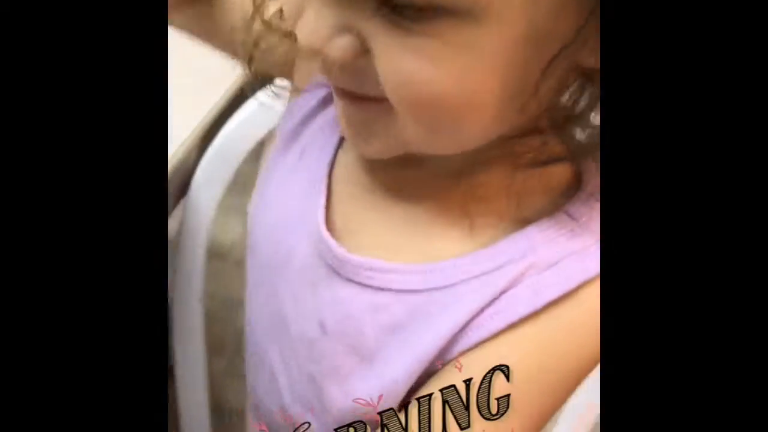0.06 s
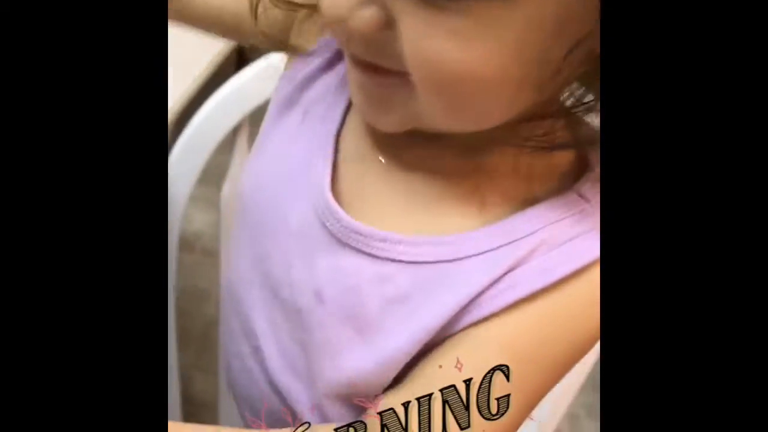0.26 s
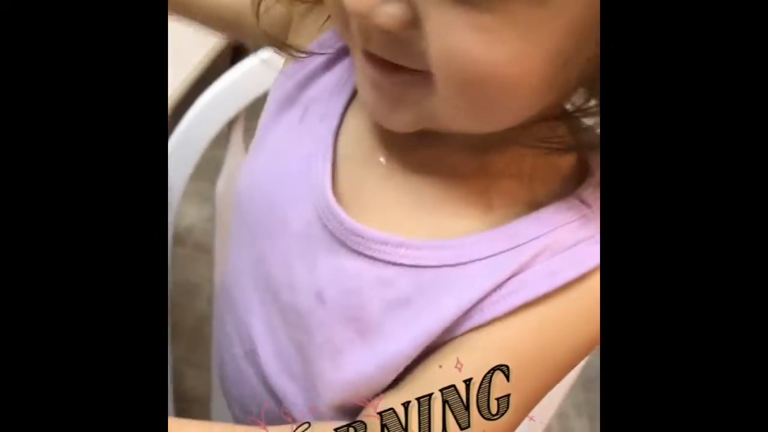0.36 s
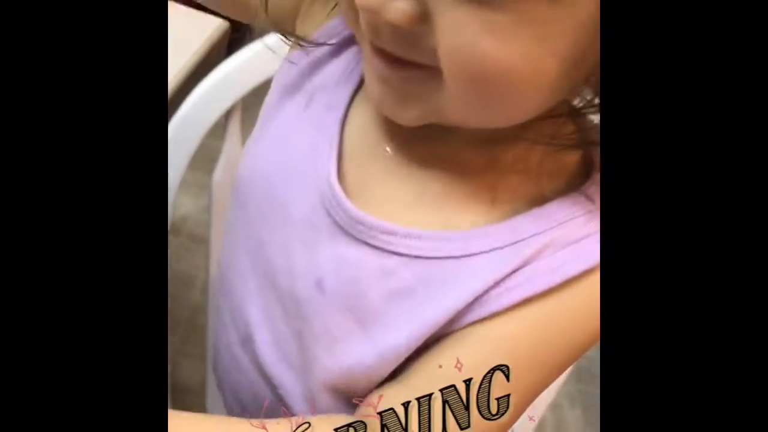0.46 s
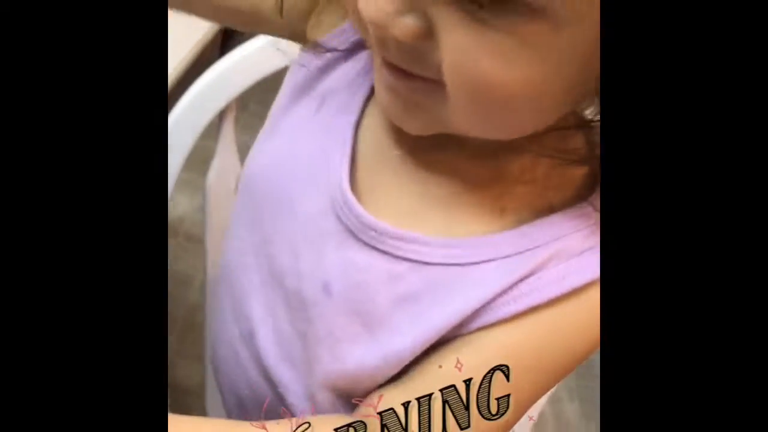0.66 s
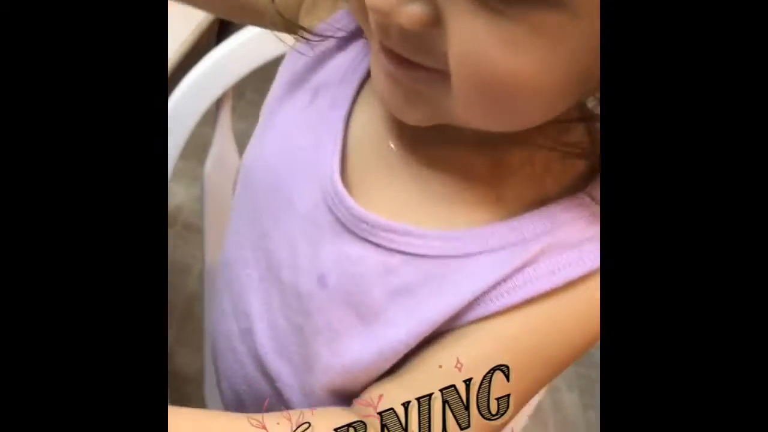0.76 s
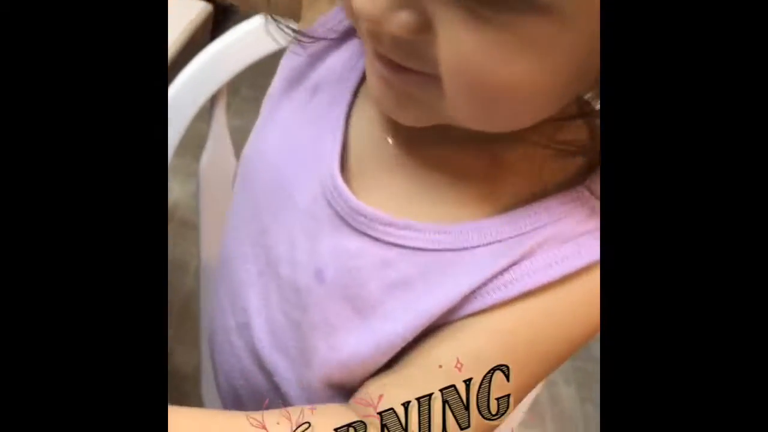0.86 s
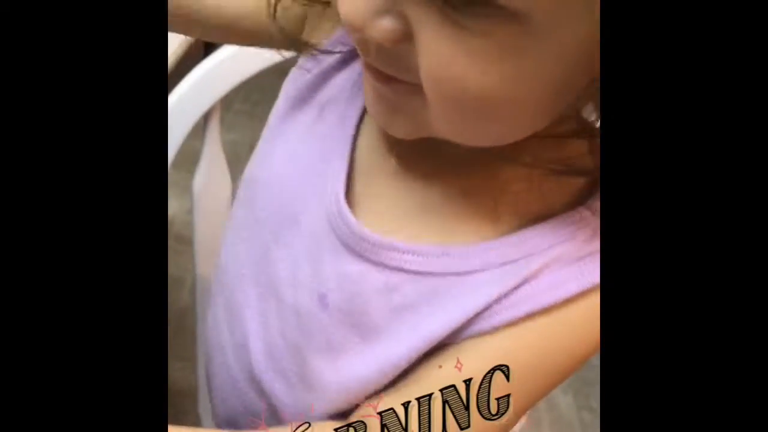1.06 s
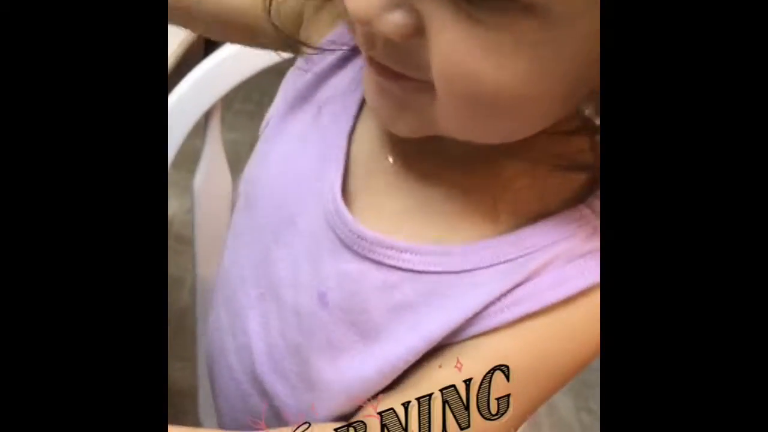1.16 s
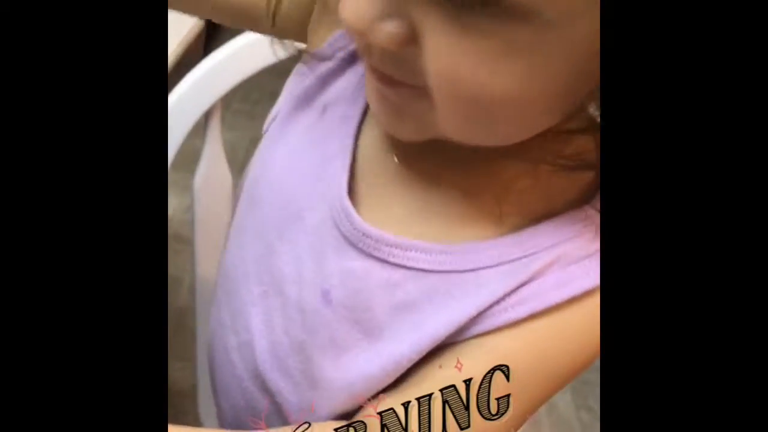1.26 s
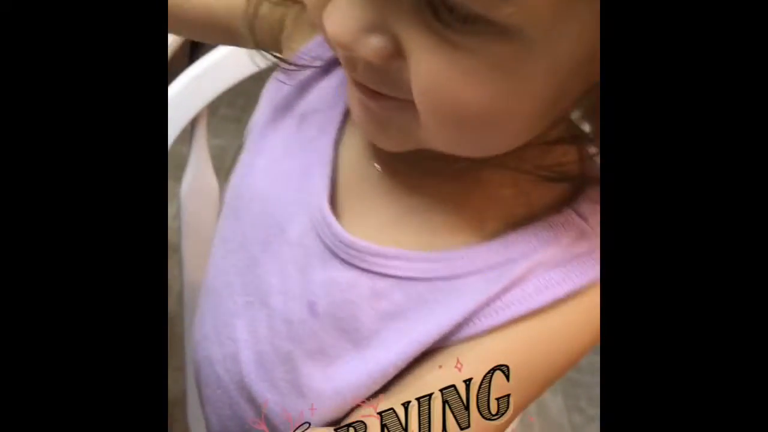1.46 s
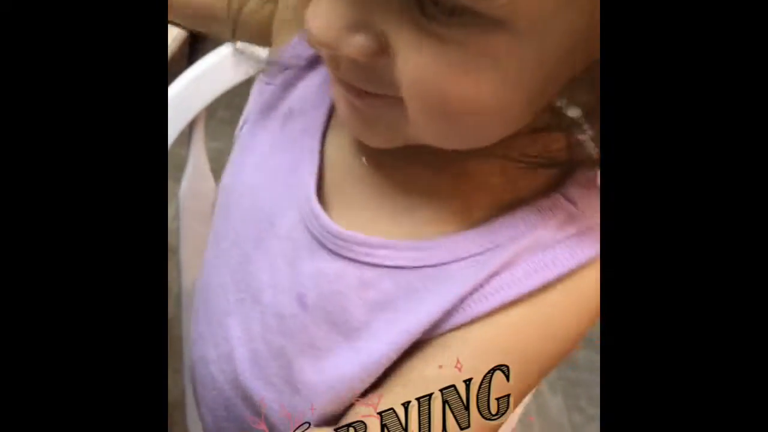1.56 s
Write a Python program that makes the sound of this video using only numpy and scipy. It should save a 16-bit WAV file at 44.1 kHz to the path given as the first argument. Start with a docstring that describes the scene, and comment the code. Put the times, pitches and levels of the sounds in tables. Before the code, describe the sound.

A wire whisk knocks a plastic bowl of flour close to the microphone, in five uneven bursts of bright clacks with short gritty drags, over faint kitchen air and a low appliance hum.

```python
"""Whisk wires knock the wall of a plastic flour bowl on a kitchen counter, close to one microphone.
Bunches of random clicks crack in the treble and ring the wall modes; single wires flick it sharply.
Swelling grain noise, with rattling and singing wires, is the drag through the flour.
Jolts sound the hollow of the bowl and send a sinking boom through the counter.
Behind are sparse room echoes, coloured noise for air and the faint wavering hum of an appliance."""
import sys
import numpy as np
from scipy import signal
from scipy.fft import rfft, irfft
from scipy.io import wavfile
from scipy.ndimage import uniform_filter1d

SR = 44100
rng = np.random.default_rng(int(sys.argv[2]) if len(sys.argv) > 2 else 0)


def gain_from_db(level_db):
    """Convert decibel levels to linear amplitude factors (20 dB per decade)."""
    decades = np.asarray(level_db, float) / 20
    return 10 ** decades


def bounce(signal):
    """Save signal as a 16-bit WAV file at the path given by the first command-line argument."""
    frames = np.transpose(np.atleast_2d(signal))
    limited = np.clip(frames, -1, 1)
    pcm = np.round(limited * 32767).astype(np.int16)
    wavfile.write(sys.argv[1], SR, pcm)


N = 70560  # length in samples


def evened(x):
    """Scales to rms 1."""
    return x / np.sqrt(np.mean(x ** 2) + 1e-20)


def read_curve(points, hz):
    """Reads a table on a log-frequency axis."""
    point_hz, value = np.transpose(points)
    return np.interp(np.log(hz + 1), np.log(point_hz + 1), value)


def coloured(x, spectrum):
    """Causal minimum-phase filter with the shape of the spectrum, scaled to unit energy."""
    hz = abs(np.fft.fftfreq(4096, 1 / SR))
    log_gain = np.log(gain_from_db(np.maximum(read_curve(spectrum, hz), -100)))
    response = np.fft.ifft(np.exp(np.conj(signal.hilbert(log_gain)))).real
    return signal.oaconvolve(x, response / np.linalg.norm(response))[:len(x)]


def ring(x, hz, db, t60):
    """One decaying mode driven by x, of unit energy per click before its level db."""
    soft_turns = 0.6  # onset time constant, in cycles of the mode
    t = np.arange(round(t60 * SR) + 8) / SR
    mode = gain_from_db(-60 * t / t60) * np.sin(2 * np.pi * hz * t)
    mode = mode * (1 - np.exp(-t * hz / soft_turns)) ** 2
    return gain_from_db(db) * signal.oaconvolve(x, mode / np.linalg.norm(mode))[:len(x)]


def clicks(per_s, spread_db):
    """Random clicks of both signs, rms 1 overall; a few are large."""
    chance, sign, size = rng.random(N), rng.standard_normal(N), rng.exponential(1, N)
    happens = chance < per_s / SR
    return evened(happens * sign * gain_from_db(spread_db * np.minimum(size, 4)))


# spectrum of the room air: pitch_hz [Hz], relative level_db [dB per Hz]
AIR_SPECTRUM = [(15, -48), (25, -7), (108, -14.5), (277, -9), (344, -15.5), (695, -23.5), (1700, -31),
                (3160, -38), (12500, -41.5), (14400, -44), (16000, -84)]
# appliance hum tones: pitch_hz [Hz], width_hz [Hz], level_db [dB]
HUM_TONES = [(178.5, 24, -62), (276.6, 3.78, -51.5), (396, 9.6, -64.5), (1780, 29, -72)]


def kitchen():
    """Coloured noise for room air, with narrow hum tones slightly wavering in pitch and level."""
    air_db = -52.5  # rms
    noise = rfft(rng.standard_normal(N))
    hz = np.fft.rfftfreq(N, 1 / SR)
    out = gain_from_db(air_db) * evened(irfft(noise * gain_from_db(read_curve(AIR_SPECTRUM, hz)), N))
    for tone_hz, width_hz, db in HUM_TONES:
        waver = evened(uniform_filter1d(uniform_filter1d(rng.standard_normal(N), 2500), 2500))
        turns = np.cumsum(tone_hz + width_hz / 2 * waver) / SR + rng.random()
        level = gain_from_db(db + 0.5 * waver[::-1])
        out += level * np.sqrt(2) * np.sin(2 * np.pi * turns)
    return out


# reverberation of the room: pitch_hz [Hz], t60_s [s]
ROOM_DECAY = [(200, 0.42), (1000, 0.51), (2500, 0.39), (6000, 0.37), (14000, 0.23)]


def room(x):
    """Sparse echoes of random sign, each band dying at its own speed."""
    room_db = -15
    echoes = np.zeros(SR // 2)
    at = np.arange(200, len(echoes) - 20, 12)  # one echo in every 12 samples
    echoes[at + rng.integers(0, 12, len(at))] = rng.choice([-1., 1.], len(at))
    hz, t, bands = signal.stft(echoes, SR, nperseg=256)
    decay = gain_from_db(-60 * t / read_curve(ROOM_DECAY, hz)[:, None])
    tail = signal.istft(bands * decay, SR, nperseg=256)[1]
    return gain_from_db(room_db) * signal.fftconvolve(x, tail / np.linalg.norm(tail))[:N]


# bowl jolted against the counter, relative levels: start_s [s], hollow_db [dB], boom_db [dB]
BOWL_JOLTS = [(.216, -31.5, -48.5), (0.2702, -28.5, -36.5), (.288, -37.5, -57), (0.58, -40.5, -64),
              (0.634, -32.5, -43.5), (0.9776, -27.5, -49.5), (0.995, -34, -34.5), (1.062, -26, -32.5),
              (1.349, -31, -35.5), (1.366, -43, -56)]
# modes of the hollow of the bowl: pitch_hz [Hz], relative level_db [dB], t60_s [s]
HOLLOW_MODES = [(170.3, -11, 0.12), (231, -3, 0.049), (350, 3.5, 0.034), (400.8, -4, 0.098),
                (552, -3, 0.024)]


def jolts():
    """A soft push sounds the hollow of the bowl; a sinking boom follows from the counter."""
    push_s = 0.0013  # about half the width of the push
    boom_start_hz, boom_end_hz, boom_fall_s = 103.6, 30, 0.016
    boom_rise_s, boom_t60_s = 0.014, 0.18
    hollow, booms, t = np.zeros(N), np.zeros(N), np.arange(SR // 3) / SR
    for start_s, hollow_db, boom_db in BOWL_JOLTS:
        hollow[round(start_s * SR)] = gain_from_db(hollow_db)
        booms[round(start_s * SR)] = gain_from_db(boom_db)
    push = np.hanning(round(2 * push_s * SR) + 3)
    hollow = np.convolve(hollow, push / push.sum())[:N] * np.sqrt(SR * 0.01)
    # the boom spreads through the counter: high bending waves arrive first, the lowest last
    hz = boom_end_hz + (boom_start_hz - boom_end_hz) * np.exp(-t / boom_fall_s)
    swell = np.sin(np.pi / 2 * np.minimum(t / boom_rise_s, 1)) ** 2 * gain_from_db(-60 * t / boom_t60_s)
    boom = 2 * swell / swell.max() * np.sin(2 * np.pi * np.cumsum(hz) / SR)
    return sum(ring(hollow, *mode) for mode in HOLLOW_MODES) + signal.oaconvolve(booms, boom)[:N]


# modes of the bowl wall and wires: pitch_hz [Hz], relative level_db [dB], t60_s [s]
WALL_MODES = [(619, 12.5, 0.062), (694.4, 9, 0.051), (743, 9, 0.021), (878, 6, 0.05), (1240, -9.5, .025),
              (1350, -0.5, 0.028), (1469, 3, 0.015), (1635, 3, 0.0308), (1664, -8.5, 0.43),
              (1872, 4.5, 0.034), (2132, 3.5, 0.016), (2270, 0, 0.047), (2578, 3.5, 0.018),
              (2760, 2, 0.024), (3150, 11, 0.025), (3552, 7, 0.013), (4090, -2, 0.035), (4440, 4.5, 0.02),
              (5020, -2.5, 0.011), (5500, 0, 0.007)]


def wall_ring(drives, drive_db, best_hz, reach_oct):
    """Every drive rings the wall modes that lie near its own pitch, with the rumble cut away."""
    rumble_cut_hz = 270
    out = np.zeros(N)
    for hz, db, t60 in WALL_MODES:
        nearness = np.exp(-0.5 * (np.log2(hz / best_hz) / reach_oct) ** 2)
        drive = (gain_from_db(drive_db) * nearness * drives).sum(0)
        out += ring(drive, hz, db, t60)
    rumble_cut = signal.butter(2, rumble_cut_hz, "high", fs=SR, output="sos")
    return signal.sosfilt(rumble_cut, out) / 2


# treble modes of the whisk wires: pitch_hz [Hz], relative level_db [dB], t60_s [s]
WIRE_MODES = [(6430, -20, 0.032), (8450, -21.5, 0.026), (9780, -21, 0.0084), (11450, -21.5, 0.0073),
              (12580, -19.5, 0.017)]


def wire_ring(x):
    """The thin wires sing in the treble when x excites them."""
    return sum(ring(x, *mode) for mode in WIRE_MODES)


# wires dragging through flour along the wall: start_s [s], length_s [s], level_db [dB],
# swell [share of the length], pitch_hz rung best [Hz]
FLOUR_DRAGS = [(0, 0.045, -48, 0.05, 2200), (0.218, 0.067, -24, 0.061, 1600),
               (0.272, 0.069, -37.5, 0.11, 1740), (0.306, 0.14, -43, 0.22, 2500),
               (0.599, 0.02, -61, 0.18, 4100), (0.619, 0.00906, -23, 0.97, 2110),
               (0.624, 0.097, -31.5, 0.075, 2300), (0.682, 0.13, -40.5, 0.24, 2270),
               (0.709, 0.046, -43, 0.66, 3550), (0.991, 0.091, -32.5, 0.073, 1960),
               (1.059, 0.041, -36, 0.1, 1930), (1.081, 0.13, -40, 0.17, 2150),
               (1.346, 0.075, -31.5, 0.037, 1710), (1.401, 0.081, -41.5, 0.64, 1750)]
# spectrum of the flour grains: pitch_hz [Hz], relative level_db [dB per Hz]
GRAIN_SPECTRUM = [(180, -8.5), (300, -14.5), (486, -9.5), (656, -5), (1560, -5), (2250, 0.5), (2440, -2.5),
                  (4910, -13), (13500, -13.5), (16000, -53)]


def drags():
    """Fine grains swell and fade with each stroke while the wires rattle on the wall and sing."""
    grains_per_s, grain_spread_db = 33000, 3.5
    rattles_per_s, rattle_spread_db, rattle_reach_oct = 1500, 3.5, 0.18
    rattle_db, sing_db = -5.5, 4.5  # drives of wall and wires, relative to the stroke level
    taper = 2.1  # how softly a stroke starts and ends
    start_s, length_s, db, swell, best_hz = np.transpose(FLOUR_DRAGS)[:, :, None]
    progress = (np.arange(N) / SR - start_s) / length_s
    swell = np.clip(swell, 0.03, 0.95)
    ramp = np.clip(np.minimum(progress / swell, (1 - progress) / (1 - swell)), 0, 1)
    stroke = np.sin(np.pi / 2 * ramp) ** taper
    grains = (gain_from_db(db) * stroke).sum(0) * clicks(grains_per_s, grain_spread_db)
    rattles = stroke * clicks(rattles_per_s, rattle_spread_db)
    singing = wire_ring((gain_from_db(db + sing_db) * rattles).sum(0))
    rattling = wall_ring(rattles, db + rattle_db, best_hz, rattle_reach_oct)
    return coloured(grains, GRAIN_SPECTRUM) + rattling + singing


# single wires flicking the wall: start_s [s], level_db [dB]
WIRE_TAPS = [(0.2706, 0), (0.2885, -11), (0.6266, -2), (0.6403, 2), (0.6439, -13.5), (1.0633, 2.5),
             (1.0637, 0.5), (1.067, -33)]
# spectrum of a flick: pitch_hz [Hz], relative level_db [dB per Hz]
TAP_SPECTRUM = [(240, -27.5), (400, -2.5), (1730, 4.5), (4800, -13), (5780, -15.5), (11900, -1),
                (14100, -8.5), (16000, -32)]


def taps():
    """Each flick is one sharp click of random sign, across the whole range."""
    hits = np.zeros(N)
    for (start_s, db), sign in zip(WIRE_TAPS, rng.choice([-1., 1.], len(WIRE_TAPS))):
        hits[round(start_s * SR)] = sign * gain_from_db(db)
    return coloured(hits, TAP_SPECTRUM)


# wires striking the wall: start_s [s], crack_db [dB], length_s over which the wires land [s],
# ring_db driving the wall [dB], pitch_hz rung best [Hz]
WALL_KNOCKS = [(0.2110, -15.5, 0.0062, -10.5, 1390), (0.2150, -28, 0.0078, -12, 2100),
               (0.21, -28.5, 0.0034, -23, 4200), (.2130, -34, 0.0069, -18, 868),
               (0.2123, -43, 0.0074, -26, 743), (.2140, -30, 0.0067, -16, 2726),
               (0.221, -16, 0.0085, -48, 1870), (0.268, -22.5, 0.0032, -34, 4800),
               (0.27, -19, .001, -27, 1510), (.2702, -45, 0.0013, -27, 2760),
               (0.286, -23.5, 0.00081, -40.5, 4030), (0.578, -22, 0.0033, -19.5, 3920),
               (0.5783, -36, 0.00091, -25, 2150), (.5840, -33, 0.0081, -25, 1980),
               (0.5885, -31.5, 0.0054, -21, 4330), (.5785, -43, 0.0041, -38, 586),
               (.5880, -33, 0.0043, -34, 670), (0.598, -37.5, 0.029, -48, 754),
               (0.622, -29, 0.0021, -18.5, 2370), (0.6257, -33, 0.0028, -12.5, 2390),
               (0.6265, -49, 0.0027, -30, 1680), (0.624, -30, 0.0037, -17, 896),
               (.6320, -37, .004, -32, 860), (0.625, -26, 0.0022, -22.5, 3460),
               (0.635, -20, 0.0019, -23.5, 2170), (0.638, -22.5, 0.0059, -20.5, 2460),
               (0.64, -43, 0.006, -24.5, 1420), (0.647, -33, .004, -53, 1470),
               (0.9776, -19, 0.002, -16, 3760), (0.9778, -41, 0.001, -13, 5020),
               (0.9805, -31, 0.0011, -21, 2390), (0.978, -29, 0.0066, -33.5, 673),
               (0.995, -22, 0.0023, -25.5, 2260), (0.997, -31.5, 0.014, -25.5, 2140),
               (1.007, -34, 0.0023, -21.5, 1450), (1.0040, -49.5, 0.017, -38, 690),
               (1.021, -31, 0.0032, -45, 2200), (1.035, -37, 0.0025, -57, 1780),
               (1.0620, -18.5, 0.0016, -21, 1625), (1.066, -59, 0.0041, -31, 588),
               (1.07, -54, 0.0017, -39, 2130), (1.123, -45, 0.011, -30, 2180),
               (1.14, -54, 0.0035, -40, 3150), (1.3487, -23, 0.0091, -17, 2140),
               (1.348, -36.5, 0.0073, -26, 3530), (1.353, -49, 0.014, -18.5, 1220),
               (1.3630, -53, 0.0086, -28, 3550), (1.361, -30.5, 0.0083, -19.5, 2170),
               (1.351, -45, 0.0038, -30, 795), (1.364, -57, 0.0093, -29.5, 1680)]
# spectrum of the crack: pitch_hz [Hz], relative level_db [dB per Hz]
CRACK_SPECTRUM = [(1500, -40), (2700, -8), (4000, 4), (6400, -5.5), (8200, -2), (9500, -4.5), (12500, -3),
                  (14500, -8), (16500, -44)]


def knocks():
    """Each bunch of wire clicks cracks in the treble and rings the wall."""
    rise_s, crack_t60_s, clicks_per_s = 0.00014, 0.011, 30000
    crack_spread_db, blow_spread_db = 4.5, 1.0
    sag_db, first_db = -6, 18  # a bunch weakens as it lands; its first wire hits the wall hardest
    reach_oct = 0.12  # a knock rings only the modes close to its pitch
    t = np.arange(N) / SR
    wire_clicks = clicks(clicks_per_s, crack_spread_db)
    blow_clicks = clicks(clicks_per_s, blow_spread_db)
    start_s, crack_db, length_s, ring_db, best_hz = np.transpose(WALL_KNOCKS)[:, :, None]
    after = np.maximum(t - start_s - length_s, 0)
    bunch = np.clip((t - start_s) / rise_s, 0, 1) * gain_from_db(np.maximum(-60 * after / crack_t60_s, -120))
    bunch = bunch * gain_from_db(sag_db * np.clip((t - start_s) / length_s, 0, 1))
    blows = bunch * blow_clicks
    first = np.ceil(start_s[:, 0] * SR).astype(int)
    blows[np.arange(len(first)), first] = gain_from_db(first_db)
    crack = (gain_from_db(crack_db) * bunch).sum(0) * wire_clicks
    crack = coloured(crack, CRACK_SPECTRUM)  + wire_ring(crack)
    return crack + wall_ring(blows, ring_db, best_hz, reach_oct)


def scene():
    """All sources reach one microphone, heard alike in both channels."""
    whisk = knocks() + taps() + drags() + jolts()
    return np.tile(whisk + room(whisk) + kitchen(), (2, 1))


def low_pass(x):
    """Removes everything above the highest recorded frequency."""
    return signal.sosfilt(signal.butter(12, 16800, fs=SR, output="sos"), x)


def record(dry):
    """Peaks are clipped just under full scale, then the top of the treble is cut off."""
    edge_hz = 16700
    held = np.clip(dry, -0.9, 0.9)
    band_limit = signal.firwin(255, edge_hz, window=("kaiser", 9), fs=SR)
    mix = signal.oaconvolve(held, band_limit[None], "same")
    return low_pass(mix)


dry = scene()
out = record(dry)
bounce(out)
```